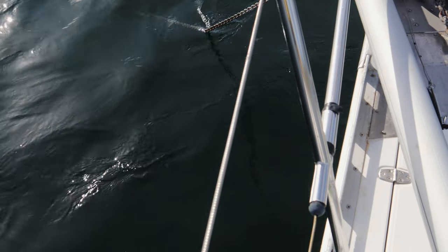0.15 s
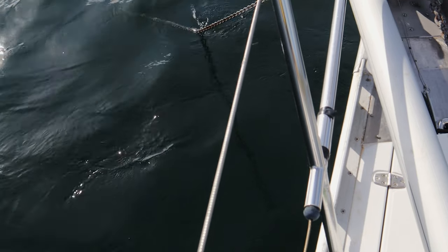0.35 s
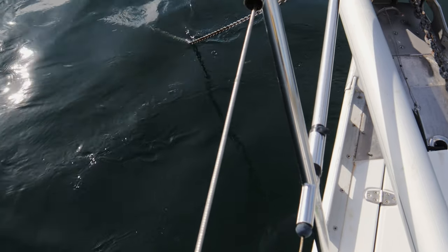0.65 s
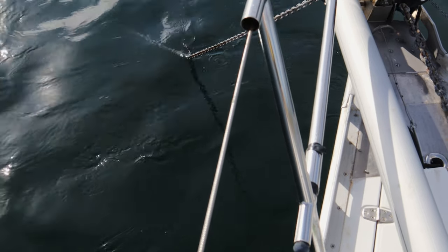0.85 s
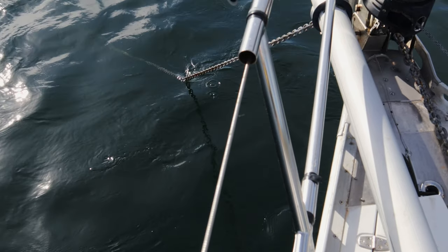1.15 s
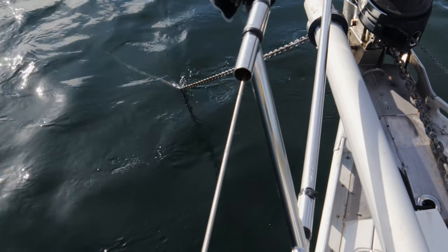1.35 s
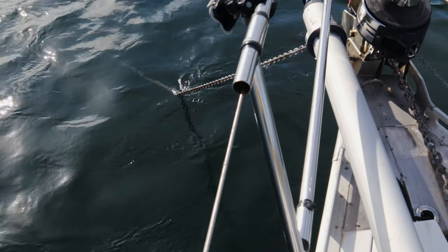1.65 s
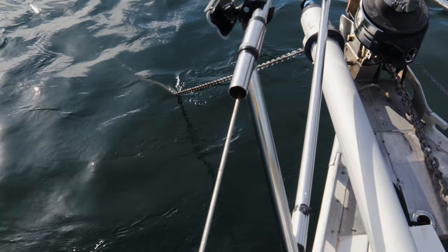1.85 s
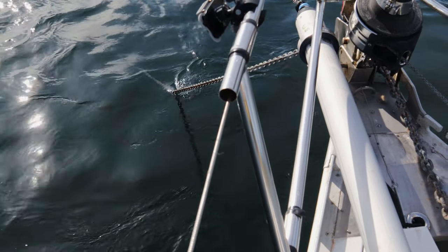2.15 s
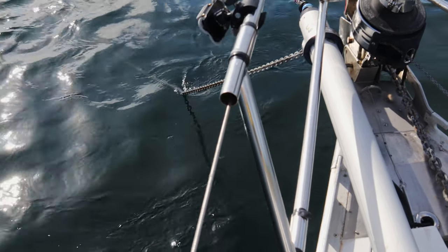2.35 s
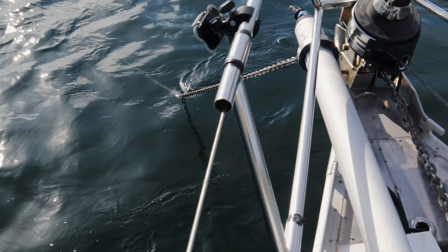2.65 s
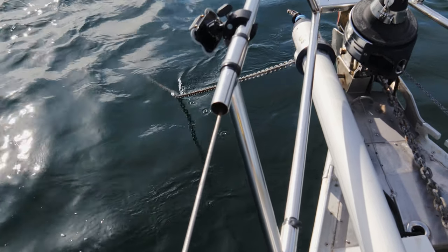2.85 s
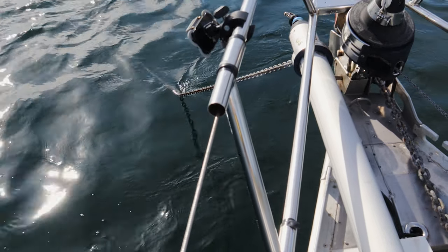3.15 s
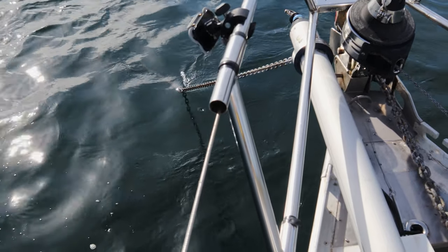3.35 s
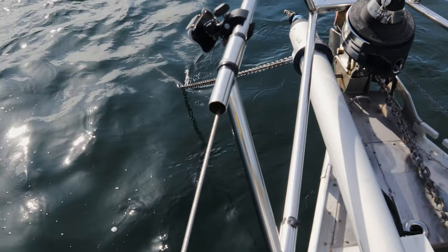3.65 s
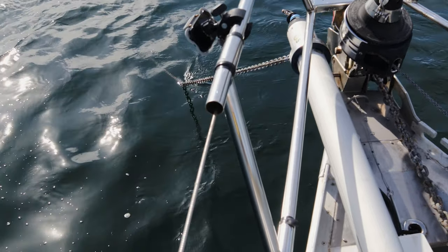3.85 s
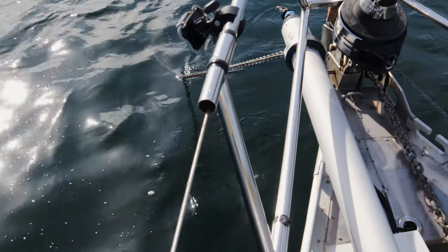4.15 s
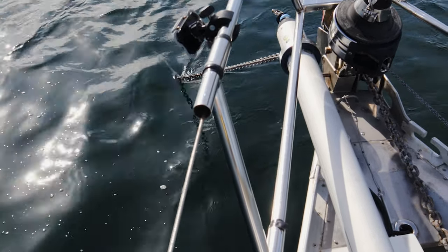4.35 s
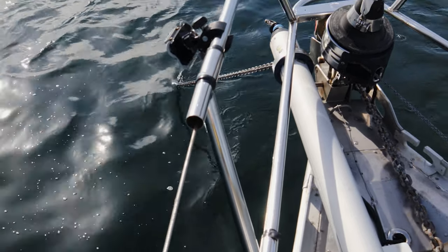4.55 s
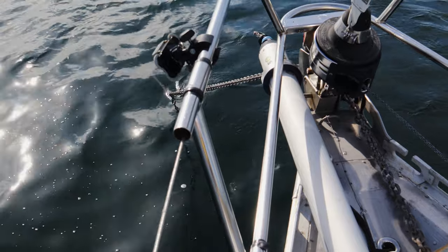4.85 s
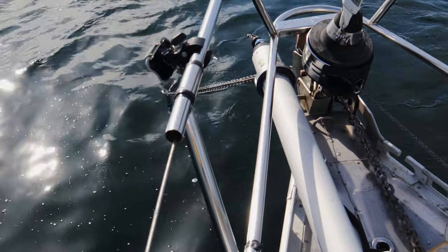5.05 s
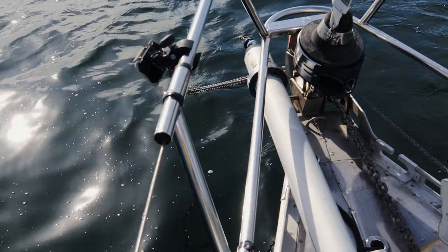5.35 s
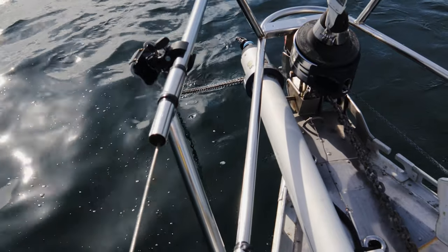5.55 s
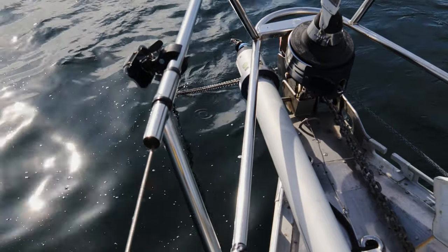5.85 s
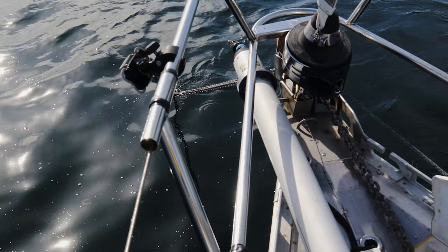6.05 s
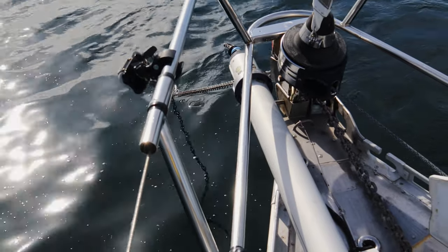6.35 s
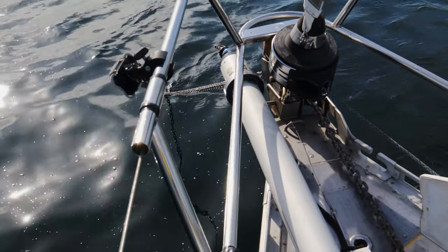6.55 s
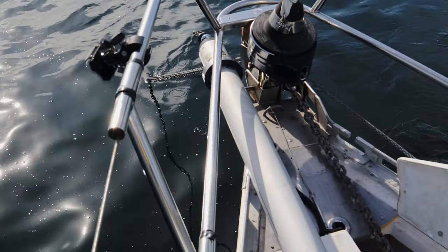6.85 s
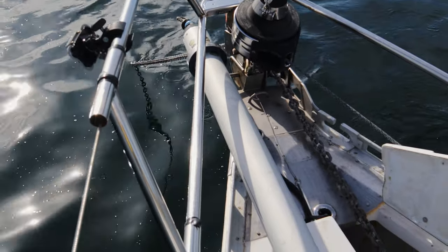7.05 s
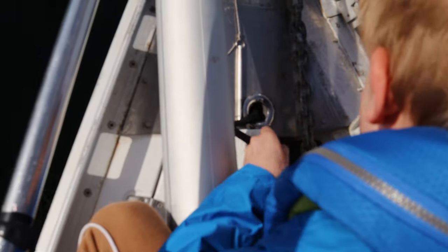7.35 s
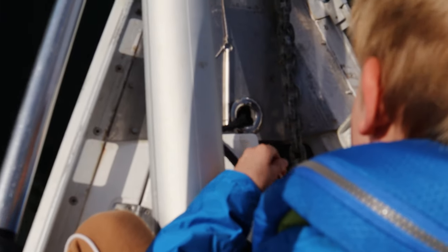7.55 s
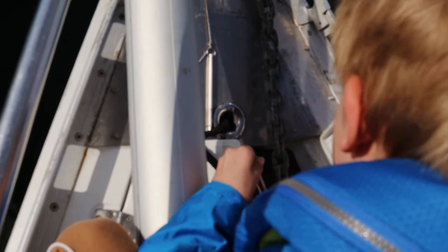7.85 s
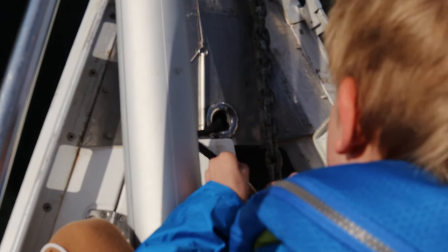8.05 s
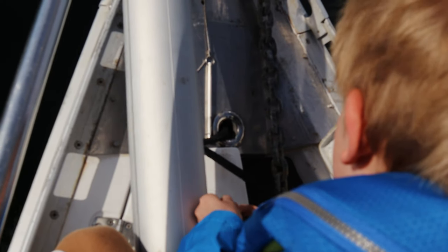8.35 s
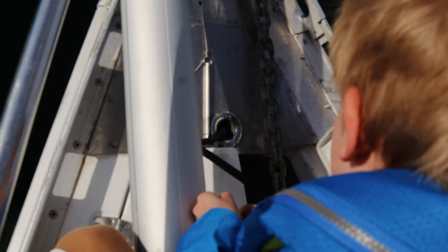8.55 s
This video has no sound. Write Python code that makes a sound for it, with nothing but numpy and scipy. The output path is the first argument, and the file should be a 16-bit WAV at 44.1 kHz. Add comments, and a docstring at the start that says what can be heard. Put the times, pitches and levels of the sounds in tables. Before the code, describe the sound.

Heavy, hollow metallic bangs of a loaded anchor chain jerking over a boat's bow roller, spaced seconds apart above low hull rumble and soft water laps.

```python
"""Heavy bangs: a loaded anchor chain slips over the bow roller of a small boat and hits the fitting.
Each blow sums decaying foredeck modes, banded noise for the crowded modes and a ringing steel rail.
Loose links clink (short modes, a tick, a faint tail); waves slap (low sines); drops chirp (rising sines).
Behind: filtered-noise wash, trickle, a cloth rustle, and rumble and hiss that fade to a lower level
late, then partly return."""
import sys
import numpy as np
from scipy import signal
from scipy.fft import rfft, irfft, next_fast_len
from scipy.io import wavfile

SR = 44100
rng = np.random.default_rng(int(sys.argv[2]) if len(sys.argv) > 2 else 0)


def materialize(psi):
    """Save the field psi as 16-bit PCM at rate SR to the path in sys.argv[1].

    A 1-D psi becomes a single channel; in a 2-D psi each row is a channel.
    """
    bounded = np.clip(np.atleast_2d(psi).T, -1, 1)
    quanta = np.round(bounded * 32767).astype(np.int16)
    wavfile.write(sys.argv[1], SR, quanta)


N = 383669

# Blows on the bow, relative levels: start_s, thump_db, boom_db, body_db, crack_db, steel_db, rail_db,
# boom_rise_ms, boom_t60_factor, crack_t60_factor
BLOWS = [(0.0136, -28, -22.5, -56, -56, -72, -75, 5.8, 0.99, 0.81),
         (0.4663, -43, -36, -40, -58, -70, -75, 13, 0.91, 0.75),
         (0.6398, -13, -10.5, -20.5, -24, -54, -61.5, 6, 0.9, 0.95),
         (0.657, -12, -17, -13.5, -20.5, -45, -60, 9, 0.73, 0.83),
         (1.0884, 0, 6.5, -5, -7, -28.5, -26, 17.5, 0.73, 0.76),
         (3.6336, -10, -11.5, -9.5, -17.5, -30, -41, 4.1, 1, 1.17),
         (3.6453, -11.5, -2.5, -4, -5.5, -19.5, -23, 19, 0.88, 0.8),
         (3.830, -45, -17, -30, -61, -75.5, -70, 8, 0.73, 0.75),
         (3.852, -24, -19.5, -44, -71.5, -72, -75, 6.3, 0.67, 0.86),
         (5.7152, -10, -5.5, -10, -19.5, -38, -55.5, 10.7, 0.96, 0.98),
         (5.8217, -26.5, -12, -4, -5.5, -17.5, -21.5, 18, 0.88, 0.79),
         (6.818, -9, -1.5, -14, -20.5, -63, -60, 12.5, 0.85, 1.05),
         (7.8286, -19.5, -10, -11.5, -17.5, -32.5, -70, 12, 0.75, 0.6)]
# Clear foredeck modes, before the blow's factors: pitch_hz, level_db, t60_s
DECK_MODES = [(103.6, -9, 0.61), (143, -4.5, 0.41), (158, -2, .22), (191.8, -2, 0.26), (224.4, 0.5, 0.3),
              (275.3, -4, 0.23), (343.3, -2.5, 0.22), (380, -4, 0.19), (438.1, -2, 0.21),
              (473.4, -11, 0.03), (525, -10, 0.2), (614.3, -5, 0.14), (680, -9, 0.12), (749, -5, 0.12),
              (882, -6, .22), (949, -7, 0.23), (1353, -11.5, 0.28)]
# Crowded foredeck modes, nominal decay: frequency_hz, t60_s
CROWD_T60 = [(90, 0.35), (240, 0.32), (630, 0.24), (1650, 0.21), (3000, 0.16), (4800, 0.15), (7000, 0.1),
             (11500, 0.13)]
# Slower plates against the struck spot: frequency_hz, level_db
LINGER = [(300, -12), (1500, -9), (4000, -11), (10000, -17)]
# Rail modes, before RAIL_T60_FACTOR: pitch_hz, level_db, t60_s
RAIL_MODES = [(1046, -16, 1.1), (1052, 0, 0.48), (2930, -8, .19), (2860, -9, .17), (985, -9, .24),
              (1104, -7, .26), (1167, -7, .26), (1680, 1, 0.18), (2330, -7, .16)]
# Loose links touching: start_s, level_db, brightness_db_per_octave
CLINKS = [(1.8873, -51, -9), (2.1517, -51, -16.5), (6.9338, -49, 22), (6.9517, -35.5, 6),
          (6.9586, -34.5, -4), (6.9656, -37, 6), (7.5855, -60, -12), (7.597, -44, 1), (7.612, -48, 3),
          (7.801, -17.5, 0.5), (7.9423, -58.5, -18), (7.9648, -60, -8), (8.0497, -27.5, 0),
          (8.243, -59, -14.5), (8.329, -48, 1), (8.354, -47, -6)]
# Modes of one link, nominal: pitch_hz, level_db, t60_s
LINK_MODES = [(2590, -29, 0.022), (4847, -11.5, 0.024), (5770, -5, .025), (6770, -4.5, 0.035),
              (6830, -10, 0.057), (7970, -6, 0.02), (8580, -10.5, 0.019), (9130, -2, 0.031),
              (14800, -14, .012)]
# Clearer drops: start_s, level_db, nominal pitch_hz
DROPS = [(0.056, -51, 3280), (2.424, -44, 1770), (3.065, -48, 3100), (3.101, -52, 3100), (3.136, -56, 4000),
         (3.152, -45, 1800), (3.172, -26, 4020), (3.178, -45, 2380), (3.184, -44, 4100), (3.188, -42, 2000),
         (3.268, -45, 2150), (3.373, -52, 2600), (5.553, -40.5, 1540), (6.098, -50, 2615),
         (6.577, -52, 3630), (6.711, -37, 1560), (7.024, -44.5, 2600), (7.035, -39, 1760),
         (7.060, -39, 2080)]
# Waves slapping the hull: start_s, relative level_db, pitch_hz, t60_s
SLAPS = [(0.289, -22, 60.7, 0.093), (0.927, -27, 46, 0.086), (1.686, -26, 51.8, 0.23),
         (1.857, -30.5, 54.7, 0.23), (2.029, -38, 45.8, 0.14), (2.361, -21.5, 48, 0.15),
         (2.488, -27.5, 47, 0.14), (2.705, -35, 67.5, 0.29), (2.936, -32, 43.8, 0.16),
         (4.258, -29.5, 72, 0.1), (5.379, -34.5, 35.5, 0.27), (7.119, -33.5, 83.2, 0.28),
         (7.382, -17.5, 74, 0.12), (7.559, -39, 43, 0.33), (7.637, -23.5, 72.4, 0.16),
         (7.886, -53, 85.4, 0.75)]
# Noise spectra, relative: frequency_hz, density_db_per_hz
WASH_SPECTRUM = [(12, -33), (20, -2.5), (48, 2.5), (81, -4), (102, -12.5), (130, -14.5), (170, -32),
                 (290, -120)]
RUMBLE_SPECTRUM = [(59, -28.5), (100, -3.5), (134, -1.5), (290, -10), (331, -5), (409, -12), (461, -3.5),
                   (586, -14), (635, -8), (670, -15), (725, -16.5), (959, -23), (1390, -22.5), (1510, -27),
                   (2400, -38.5), (3120, -67), (5280, -120)]
TRICKLE_SPECTRUM = [(1200, -12), (2200, -2), (3500, -4), (5500, -12.5), (8000, -25.5)]
HISS_SPECTRUM = [(1470, -30), (2500, -2.5), (3850, -3.5), (4190, -4), (15000, -8), (15800, -11.5)]
MURMUR_SPECTRUM = [(1150, -17), (1280, 1), (1370, 0.5), (1470, -3.5), (1620, -18)]
RUSTLE_SPECTRUM = [(900, -12), (1800, 0), (4500, -5), (5500, -12), (9000, -13.5), (11000, -30)]
# Level of rumble and hiss, relative: time_s, gain_db
STEADY_LEVEL = [(0.0, 0), (7.1, 0.5), (7.5, -3.5), (7.9, -7.5), (8.4, -7.5), (8.7, -4.5)]
# Wave wash: time_s, level_db
WASH_LEVEL = [(0.0, -47), (0.77, -41.5), (1.31, -47.5), (1.87, -40.5), (2.4, -46), (3.13, -41), (3.78, -46),
              (4.3, -43), (5.09, -47.5), (6.57, -45), (7.0, -43), (7.3, -51), (7.85, -56.5), (8.7, -55)]
# Livelier trickling, added to the base level: middle_s, peak_db, half_width_s (to 1/e)
SPELLS = [(3.164, -65, 0.1), (6.842, -69.5, 0.39)]

THUMP_HZ, BOOM_HZ, BODY_HZ, CRACK_HZ = 130, 320, 800, 1900
CRACK_RISE_S, RAIL_T60_FACTOR = 0.0015, 0.83
TICK_DB, TICK_TOP_HZ, TICK_OCTAVES_PER_DB = -9, 7470, 0.07  # brighter touches tick higher
TICK_GAIN_DB_PER_DULL_DB = 1.16  # dull touches are mostly tick
DROP_T60_S = 0.02
RUMBLE_DB, HISS_DB, TRICKLE_DB = -47.5, -68, -75.5
RUSTLE_S, RUSTLE_DB, RUSTLE_HALF_S = 8.33, -64, 0.15
STOPBAND_HZ = 16100


def from_db(db):
    """Decibels to gain."""
    return 10 ** (np.asarray(db) / 20)


def rms_one(x):
    """Scale each row to rms 1."""
    return x / np.sqrt(np.mean(x ** 2, axis=-1, keepdims=True) + 1e-20)


def at_hz(points, hz):
    """Read a (frequency_hz, value) table on a log-frequency axis."""
    points = np.array(points)
    return np.interp(np.log(hz), np.log(points[:, 0]), points[:, 1])


def drift(rate_hz):
    """Slow random curve of spread 1: noise through two one-pole lowpasses at rate_hz."""
    step = 40  # samples per drawn value
    pole = np.exp(-2 * np.pi * step * rate_hz / SR)
    white = rng.standard_normal(N // step + 2002)
    slow = signal.lfilter([1], [1, -2 * pole, pole * pole], white)[2000:]
    return np.interp(np.arange(N) / step, np.arange(len(slow)), rms_one(slow))


def add(out, start_s, sound):
    """Mix a sound in at start_s."""
    i = round(start_s * SR)
    out[i:i + len(sound)] += sound[:N - i]


def fading(t, rise_s, t60_s):
    """Click-free envelope: builds up over rise_s, decays 60 dB per t60_s."""
    rise_s = np.maximum(rise_s, 1e-4)
    build_up = 1 - np.exp(-t / rise_s)
    soft_start = 1 - np.exp(-t / np.minimum(rise_s, 1e-3))
    return build_up * soft_start * from_db(-60 * t / np.maximum(t60_s, 2e-3))


def struck(modes, t, rise_s, spread_db, colour_db=0, t60_factor=1):
    """One blow on a set of decaying sine modes, each with a random strength and phase."""
    hz, db, t60_s = np.transpose(modes)[:, :, None]
    strength, phase = rng.standard_normal((2, len(modes), 1))
    gain = from_db(db + colour_db + spread_db * strength)
    ring = np.sin(2 * np.pi * (hz * t + phase))
    return np.sum(gain * fading(t, rise_s, t60_s * t60_factor) * ring, axis=0)


def coloured(spectrum, patchy_db, flicker_hz):
    """Noise shaped by FFT; each half-octave band flickers on its own."""
    size = next_fast_len(N)
    hz = np.maximum(np.arange(size // 2 + 1) * SR / size, 1)
    shaped = rfft(rng.standard_normal(size)) * from_db(at_hz(spectrum, hz))
    low_hz, high_hz = spectrum[0][0], spectrum[-1][0]
    edges = low_hz * 2 ** np.arange(0, np.log2(high_hz / low_hz) + .5, .5)
    out = 0
    for low, high in zip(edges, edges[1:]):
        band = irfft(shaped * (hz >= low) * (hz < high), size)[:N]
        out = out + from_db(patchy_db * drift(flicker_hz)) * band
    return rms_one(out)


def blows():
    """Clear deck modes, a crowd of close modes heard as dying noise, and the long ring of the rail."""
    out, t = np.zeros(N), np.arange(SR // 2) / SR
    edges = 70 * 2 ** (np.arange(24) / 3)  # third octaves
    centres, deck_hz = np.sqrt(edges[1:] * edges[:-1]), np.array(DECK_MODES)[:, :1]
    banks = [signal.butter(4, pair, "band", fs=SR, output="sos") for pair in zip(edges, edges[1:])]
    for (start_s, thump_db, boom_db, body_db, crack_db, steel_db, rail_db,
         boom_ms, boom_factor, crack_factor) in BLOWS:
        colour = [(60, thump_db - 15.5), (THUMP_HZ, thump_db), (BOOM_HZ, boom_db), (BODY_HZ, body_db),
                  (CRACK_HZ, crack_db), (4600, crack_db - 8.5),
                  (5700, steel_db - 1.5), (9000, steel_db + 2), (14000, steel_db - 23.5)]
        rise = [(300, boom_ms / 1000), (1200, CRACK_RISE_S)]  # lows take longer to spread through the deck
        factor = [(500, boom_factor), (2500, crack_factor)]
        white = rng.standard_normal((2, len(t) + 4000))
        sound = struck(DECK_MODES, t, at_hz(rise, deck_hz), 3.6, at_hz(colour, deck_hz) - 6, boom_factor)
        for k, hz in enumerate(centres):
            crowd = rms_one(signal.sosfilt(banks[k], white[k % 2])[4000:])
            t60_s = at_hz(factor, hz) * at_hz(CROWD_T60, hz)
            # the struck spot dies fast, the plates around it linger
            spot = fading(t, at_hz(rise, hz), 0.86 * t60_s)
            plates = from_db(at_hz(LINGER, hz)) * fading(t, 0.047, 1.22 * t60_s)
            sound += from_db(at_hz(colour, hz) - 10.5) * crowd * (spot + plates)
        rail = struck(RAIL_MODES, t, .004, 1.5, rail_db, RAIL_T60_FACTOR)
        add(out, start_s, sound + rail)
    return out


def clinks():
    """Short rough rings of small steel links, a dry tick, and a faint wide-band tail."""
    out, t = np.zeros(N), np.arange(SR // 6) / SR
    wide = signal.butter(4, [1800, 10000], "band", fs=SR, output="sos")
    for start_s, db, bright_db in CLINKS:
        links = np.repeat(LINK_MODES, 3, axis=0)  # each mode three times, slightly detuned
        links[:, 0] *= 1 + .012 * rng.standard_normal(len(links))
        tilt_db = bright_db * np.log2(links[:, :1] / 7000)
        rings = struck(links, t, 0.00033, 3.0, tilt_db - 14)
        top_hz = TICK_TOP_HZ * 2 ** (TICK_OCTAVES_PER_DB * bright_db)
        band = signal.butter(2, [top_hz / 3.4, top_hz], "band", fs=SR, output="sos")
        white = rng.standard_normal((2, len(t)))
        tick = rms_one(signal.sosfilt(band, white[0])) * fading(t, 0.0006, 0.022)
        tail = rms_one(signal.sosfilt(wide, white[1])) * fading(t, .002, 0.15)
        tick_db = TICK_DB + TICK_GAIN_DB_PER_DULL_DB * max(-bright_db - 3, 0)
        add(out, start_s, from_db(db) * (rings + from_db(tick_db) * tick + from_db(-25.5) * tail))
    return out


def slaps():
    """Each wave pushes the hull softly; it wobbles as a low decaying sine."""
    out, t = np.zeros(N), np.arange(SR // 2) / SR
    for start_s, db, hz, t60_s in SLAPS:
        add(out, start_s, from_db(db + 8.0) * fading(t, 0.026, t60_s) * np.sin(2 * np.pi * hz * t))
    return out


def bubble(t, hz, cycles, climb):
    """A trapped bubble decays 60 dB over a number of nominal cycles while its pitch climbs."""
    return fading(t, 1.8 / hz, cycles / hz) * np.sin(2 * np.pi * hz * t * (1 + climb * hz * t))


def drops():
    """Clearer drops, each trapping two bubbles of near size, and many faint single bubbles at random."""
    out, t = np.zeros(N), np.arange(SR // 10) / SR
    for start_s, db, hz in DROPS:
        cycles = DROP_T60_S * hz
        larger = bubble(t, hz * 0.98, cycles, climb=0.0002)
        smaller = bubble(t, hz * 1.07, cycles, climb=0.0003)
        add(out, start_s, from_db(db) * (larger + 0.49 * smaller))
    faint = np.zeros(N)
    for when, pitch, softness in rng.random((500, 3)):
        sound = bubble(t, 1300 * 3.5 ** pitch, cycles=30.0, climb=0.0033)
        add(faint, when * N / SR, from_db(-12 * softness) * sound)
    return out, rms_one(faint)


def swell(t, middle_s, half_s):
    """Gaussian rise and fall, 1/e at half_s from the middle."""
    return np.exp(-((t - middle_s) / half_s) ** 2)


def background():
    """Wash on the hull, rumble through the deck, trickle, drops, a sleeve brushing past, and hiss."""
    t = np.arange(N) / SR
    wash_gain, steady_gain = (from_db(np.interp(t, *np.transpose(curve))) for curve in (WASH_LEVEL, STEADY_LEVEL))
    spells = sum(from_db(db) * swell(t, middle_s, half_s) for middle_s, db, half_s in SPELLS)
    trickle_gain = from_db(TRICKLE_DB) + spells
    clear_drops, faint_drops = drops()
    sleeve_gain = from_db(RUSTLE_DB) * swell(t, RUSTLE_S, RUSTLE_HALF_S)
    sleeve = sleeve_gain * coloured(RUSTLE_SPECTRUM, patchy_db=2.0, flicker_hz=18.0)
    trickle = coloured(TRICKLE_SPECTRUM, patchy_db=3.0, flicker_hz=13.0) + from_db(-10) * faint_drops
    rumble = coloured(RUMBLE_SPECTRUM, patchy_db=1.5, flicker_hz=1.8)
    murmur = coloured(MURMUR_SPECTRUM, patchy_db=5.5, flicker_hz=20.0)  # narrow band, in blobs
    hull = rumble + from_db(-21) * murmur
    hiss = coloured(HISS_SPECTRUM, patchy_db=0.54, flicker_hz=7.2)
    steady = from_db(RUMBLE_DB) * hull + from_db(HISS_DB) * hiss
    wash = wash_gain * coloured(WASH_SPECTRUM, patchy_db=2.0, flicker_hz=4.3)
    return wash + steady_gain * steady + trickle_gain * trickle + clear_drops + sleeve


def scene():
    """Everything reaches one microphone."""
    return (blows() + clinks() + slaps() + background())[None]


def record(dry):
    """Input overload clips peaks beyond full scale; a steep lowpass cuts the top."""
    lowpass = signal.cheby2(12, 45, STOPBAND_HZ, fs=SR, output="sos")
    return signal.sosfilt(lowpass, np.clip(dry, -1, 1))


dry = scene()
out = record(dry)
materialize(out)
```